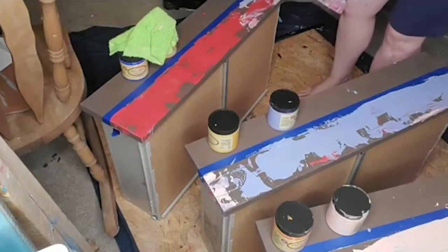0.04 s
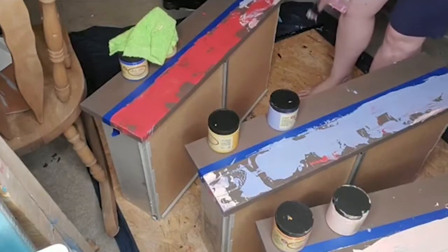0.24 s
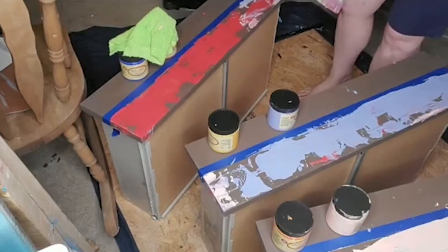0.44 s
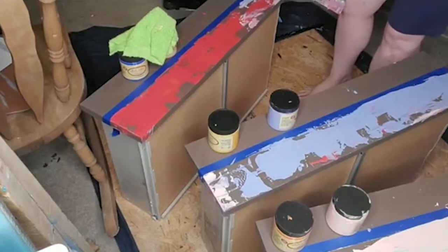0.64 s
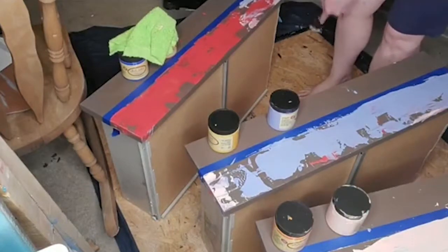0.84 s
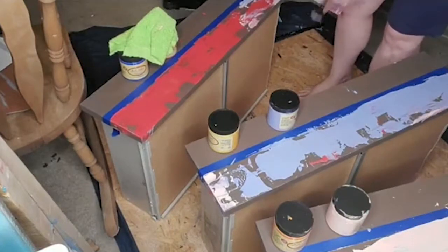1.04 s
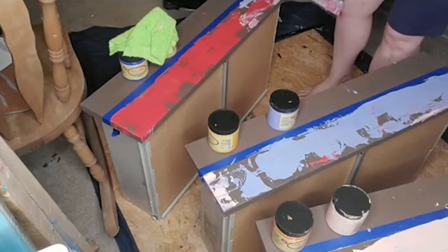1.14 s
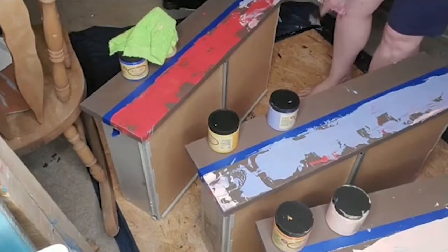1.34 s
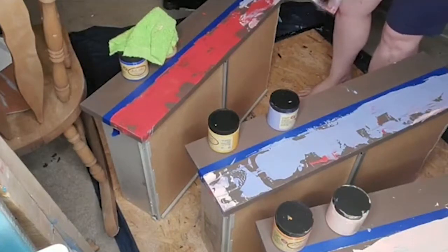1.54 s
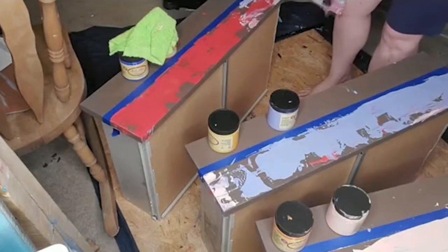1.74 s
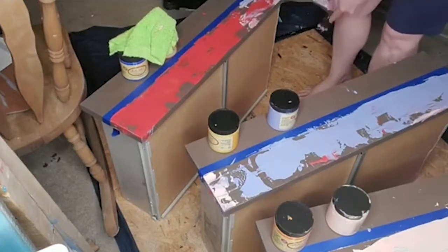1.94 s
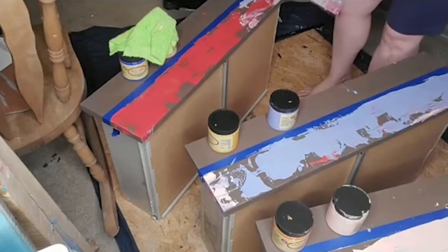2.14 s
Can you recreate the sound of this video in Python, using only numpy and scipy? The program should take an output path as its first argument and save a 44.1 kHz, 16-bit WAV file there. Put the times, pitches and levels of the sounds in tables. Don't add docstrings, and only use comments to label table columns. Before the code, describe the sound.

A steel putty knife works at paint on a wooden cabinet in a small room, tapping, scraping briefly and snapping free with sharp cracks, a little away from the microphone, over a faint low motor hum.

```python
import sys
import numpy as np
from scipy import signal
from scipy.fft import rfft, irfft, next_fast_len
from scipy.io import wavfile
from scipy.ndimage import map_coordinates

SR = 44100
rng = np.random.default_rng(int(sys.argv[2]) if len(sys.argv) > 2 else 0)


def transcribe(u):
    v = np.clip(np.atleast_2d(u).T, -1, 1)
    q = np.round(v * 32767).astype(np.int16)
    wavfile.write(sys.argv[1], SR, q)


def elevation(decibels):
    levels = np.asarray(decibels, float)
    return 10 ** (levels / 20)


N = 97020

KNOCK_STARTS = [.2618, .5606, .8576, 1.2649, 1.3652, 1.4017, 1.7235, 1.7628, 1.8802, 2.1605]
# peak [dB], then ring of board, blade root, blade bend and blade tip [dB].
KNOCKS = [
    (-12, -28, -4, -7, -4),
    (-30.5, -6, 5.5, -1, -11.5),
    (-13, -28, 1, -4.5, 5),
    (-23.5, -6, 1, 2.5, -10),
    (-21, -20, 0.5, 5.5, 2),
    (-13, -14, 0, -1.5, -1),
    (-24, 28.5, 20, -19.5, -31),
    (-28.5, 14, 7, -7.5, -8),
    (-12, -15.5, 0, 0, -4),
    (-30.5, 8, 3.5, -17, -3),
]
DRAG_STARTS = [0, .2, .245, .563, .802, .826, 1.268, 1.335, 1.364, 1.727, 1.78, 2.163, .872]
# length [s], level [dB], swell over the stroke [dB], brightness [dB], ring of the blade bend [dB].
DRAGS = [(0.011, -43.5, -18, -0.5, -3), (0.04, -58.5, 14.5, 2, -9), (.017, -38.5, -11.5, 1.5, -7),
         (.03, -57, 12.5, -1, -1), (0.031, -66.5, 8, 1.5, -6), (0.016, -49.5, 11.5, -2, 4.5),
         (0.035, -46, -14.5, -7, -5), (0.039, -49, 13.5, 0, -1.5), (0.033, -46, -5, -10, -2.5),
         (0.068, -49.5, 1.5, -5.5, 0.5), (0.094, -44, -5.5, -1.5, 4.5), (0.0486, -52, -20, 7, -8),
         (.04, -39.5, -3, -2.5, 2.5)]
SQUEAK_STARTS = [.246, .246, .005, .033, 1.36, 1.785, 1.762, 2.161, .828, .84, 1.85]
SQUEAK_PITCHES = [4420, 11300, 4350, 4300, 3750, 2600, 4950, 4500, 4450, 4450, 3320]
# length [s], level [dB].
SQUEAKS = [(0.017, -33), (.008, -48.5), (0.018, -60.5), (0.024, -71), (0.0053, -51), (0.007, -36.5),
           (.006, -38), (0.0033, -39.5), (0.0044, -44.5), (0.011, -51.5), (0.011, -58)]
THUD_STARTS = [.262, .859, .859, .859, 1.266, 1.402, 1.402, 1.724, 1.881, .915, .27, .72, .262, 1.368,
               1.881, .561, .561, 1.265, 1.265, 1.724, 2.161, 2.161, .858, .5606, 1.4017, 1.4017, 1.8802,
               .262]
# pitch [Hz], width [Hz], peak level [dB].
THUDS = [(417, 60, -54.5), (400, 110, -45.5), (560, 230, -48), (968, 80, -49.5), (339.6, 17, -58.5),
         (445, 160, -50), (648, 104, -48.5), (500, 270, -47), (932, 62, -51), (110.2, 17.5, -49.5),
         (60, 20, -49.5), (55, 20, -53), (1668, 40, -51), (1680, 190, -42), (1733, 230, -33),
         (2205, 250, -39), (4490, 300, -40), (3100, 540, -36.5), (4500, 230, -49.5), (1388, 160, -47.5),
         (1330, 210, -46.5), (2040, 146, -42), (2470, 340, -32.5), (7340, 600, -43), (6070, 450, -31),
         (7550, 370, -28.5), (7000, 900, -22), (2410, 100, -38)]
# centre [Hz], width [Hz], level [dB].
BOARD = [(1100, 80, -6.5), (1314, 120, 0)]
BLADE_ROOT = [(2042, 201, 1.5), (2277, 96, -1.5), (2428, 78, 1), (2757, 363, -5)]
BLADE_BEND = [(3297, 190, -0.5), (3880, 470, -1)]
BLADE_MIDDLE = [(4367, 330, -1), (4968, 490, -4), (5620, 500, -3.5), (6314, 1100, -3.5)]
BLADE_TIP = [(7620, 500, -1), (8500, 900, -5), (9300, 1000, -4), (10100, 800, -3), (11400, 1400, -2)]
# frequency [Hz], gain [dB].
CARRY = [(300, -20), (900, -0.5), (1500, -0.5), (12000, -2), (13000, -4), (14500, -10), (15400, -33.5),
         (16300, -64.5)]
# frequency [Hz], time to fall 60 dB [s].
ROOM_DECAY = [(300, 0.32), (800, .3), (2000, 0.18), (5500, 0.21), (12000, 0.19)]
# frequency [Hz], level [dB per Hz].
RUMBLE = [(12, -49.5), (25, -7), (55, 5), (90, 1), (135, 7.5), (170, -12), (230, -2.5), (330, -24),
          (500, -120)]
HISS = [(180, -43), (300, -7), (700, -12.5), (1060, -15.5), (2120, -25), (4600, -29), (5300, -37),
        (11500, -40), (13000, -69)]
# rms level [dB], unsteadiness [dB].
HUM_PITCHES = [119.7, 720.1]
HUM = [(-63, 1), (-63, 2.1)]

MODE_SCATTER_DB = 1.5
SKIRT = 1.263
ROOM_DB, ROOM_DELAY_S, ROOM_RISE_S = 3.5, 0.0024, 0.00067
CRACK_S, CRACK_RISE_S, KNOCK_DB = 0.0018, 0.0006, -7.5
SOFTER_DB = 21.5
DIRECT_DB, DIRECT_GROWS = 1, 0.25
GRAINS_PER_S, DRAG_BOARD_DB, DRAG_RISE_S, CHATTER_DB = 8600, -10.5, 0.004, 2.5
SQUEAK_SWAY, SQUEAK_DIRECT_DB = 0.019, 5.5
RUMBLE_DB, HISS_DB = -53, -63


def unit(x):
    return x / np.sqrt(np.mean(x ** 2) + 1e-20)


def along(points, hz):
    f, v = np.transpose(points)
    return np.interp(np.log(hz + 1), np.log(f + 1), v)


def filtered(x, response):
    m = next_fast_len(len(x) + 8192)
    return irfft(rfft(x, m) * response(np.fft.rfftfreq(m, 1 / SR)), m)


def causal(gain):
    cepstrum = irfft(np.log(gain + 1e-6))
    half = len(cepstrum) // 2
    fold = np.r_[1, 2 * np.ones(half - 1), 1, np.zeros(len(cepstrum) - half - 1)]
    return np.exp(rfft(cepstrum * fold))


def wobble(rate):
    points = rng.standard_normal(int(N * rate / SR) + 4)
    return map_coordinates(points, [np.arange(N) * rate / SR])


def ring(modes, f):
    power = 0
    for centre, width, db in modes:
        luck_db = MODE_SCATTER_DB * rng.standard_normal()
        damping = (f * width) ** 2
        peak = damping / ((centre ** 2 - f * f) ** 2 + damping)
        power = power + elevation(db + luck_db) ** 2 * peak ** SKIRT
    return power


def knife(force, board_db, root_db, bend_db, tip_db):
    groups = ((BOARD, board_db), (BLADE_ROOT, root_db), (BLADE_BEND, bend_db), (BLADE_MIDDLE, 0),
              (BLADE_TIP, tip_db))

    def response(f):
        power = sum(elevation(2 * db) * ring(modes, f) for modes, db in groups)
        return causal(elevation(along(CARRY, f)) * np.sqrt(power))

    return filtered(force, response)


def add_in_room(out, start, x, direct_db=0):
    hz, t, z = signal.stft(rng.standard_normal(SR // 2), SR, nperseg=256)
    decay = elevation(-60 * t / along(ROOM_DECAY, hz)[:, None])
    tail = signal.istft(z * decay, SR, nperseg=256)[1]
    tail = tail * (1 - np.exp(-np.arange(len(tail)) / SR / ROOM_RISE_S))
    direct = x * elevation(direct_db)
    wet = signal.fftconvolve(x, tail / np.linalg.norm(tail)) * elevation(ROOM_DB)
    for when, part in ((start, direct), (start + ROOM_DELAY_S, wet)):
        view = out[round(when * SR):]
        view[:len(part)] += part[:len(view)]


def knocks():
    out, t = np.zeros(N), np.arange(512) / SR
    for start, (db, *rings_db) in zip(KNOCK_STARTS, KNOCKS):
        slow = 2 ** (-db / SOFTER_DB)
        rise = (1 - np.exp(-t / (CRACK_RISE_S * slow))) ** 2
        burst = rng.standard_normal(len(t)) * elevation(-60 * t / (CRACK_S * slow)) * rise
        z = rfft(burst, 1024)
        even = irfft(z / causal(np.abs(z) + 0.3 * np.abs(z).mean()))
        x = knife(even, *rings_db)
        x = x / np.linalg.norm(x) * np.sqrt(SR / 1000)
        add_in_room(out, start, x * elevation(db + KNOCK_DB), DIRECT_DB + DIRECT_GROWS * (db + 9))
    return out


def grit(seconds):
    moment, side = rng.random((2, 8192))[:, :round(seconds * SR)]
    return unit((moment < GRAINS_PER_S / SR) * np.sign(side - 0.5))


def drags():
    out = np.zeros(N)
    for start, (length, db, swell_db, bright_db, bend_db) in zip(DRAG_STARTS, DRAGS):
        grains = grit(length)
        t = np.arange(len(grains)) / SR
        pressure = elevation(swell_db * t / length + CHATTER_DB * wobble(80)[:len(grains)])
        force = grains * pressure * (1 - np.exp(-t / DRAG_RISE_S))
        x = knife(force, DRAG_BOARD_DB - 2 * bright_db, -bright_db, bend_db, bright_db)
        x = x / np.linalg.norm(x) * np.sqrt(len(grains))
        add_in_room(out, start, x * elevation(db + swell_db / 2 - ROOM_DB))
    return out


def squeaks():
    out = np.zeros(N)
    for start, hz, (length, db) in zip(SQUEAK_STARTS, SQUEAK_PITCHES, SQUEAKS):
        sway = wobble(220)[:round(length * SR)]
        u = np.linspace(0, 1, len(sway))
        phase = 2 * np.pi * np.cumsum(hz * (1 + SQUEAK_SWAY * sway)) / SR
        tone = np.sin(phase) * np.minimum(1, 8 * u) * np.sqrt(1 - u)
        add_in_room(out, start, tone * elevation(db + 2.0 * sway - SQUEAK_DIRECT_DB), SQUEAK_DIRECT_DB)
    return out


def thuds():
    out = np.zeros(N)
    for start, (hz, width_hz, db) in zip(THUD_STARTS, THUDS):
        def resonance(f):
            damping = 1j * f * width_hz
            return (damping / (hz * hz - f * f + damping)) ** 2

        x = filtered(np.ones(1), resonance)
        add_in_room(out, start, x / np.abs(x).max() * elevation(db))
    return out


def steady_noise(spectrum):
    return unit(filtered(rng.standard_normal(N), lambda f: elevation(along(spectrum, f)))[:N])


def appliance():
    t = np.arange(N) / SR
    out = elevation(RUMBLE_DB) * steady_noise(RUMBLE) + elevation(HISS_DB) * steady_noise(HISS)
    for hz, (db, sway_db) in zip(HUM_PITCHES, HUM):
        level = elevation(db + sway_db * wobble(12)) * np.sqrt(2)
        out += level * np.sin(2 * np.pi * hz * t + 0.15 * wobble(17))
    return out


def scene():
    return (knocks() + drags() + squeaks() + thuds() + appliance())[None]


def top_cut(x):
    return signal.sosfilt(signal.butter(12, 15870, fs=SR, output="sos"), x)


def record(dry):
    return top_cut(dry)


dry = scene()
out = record(dry)
transcribe(out)
```